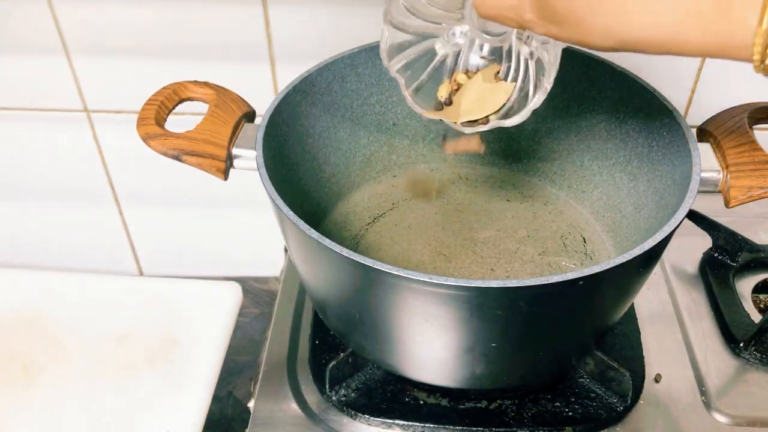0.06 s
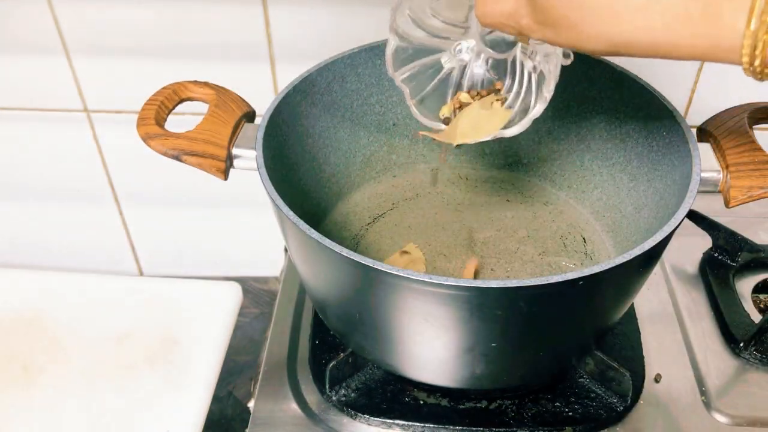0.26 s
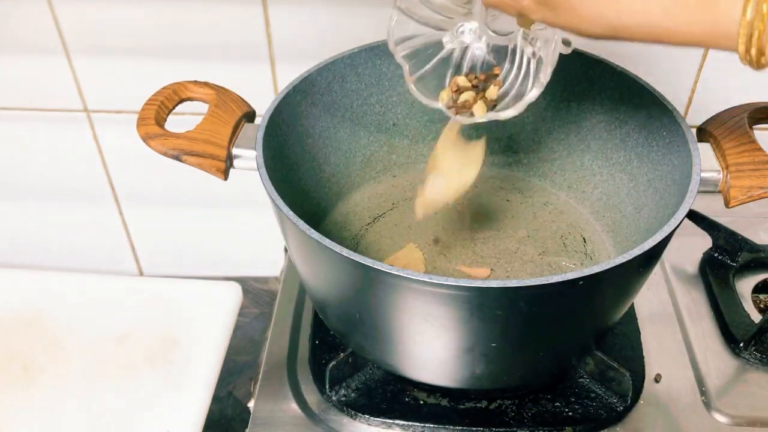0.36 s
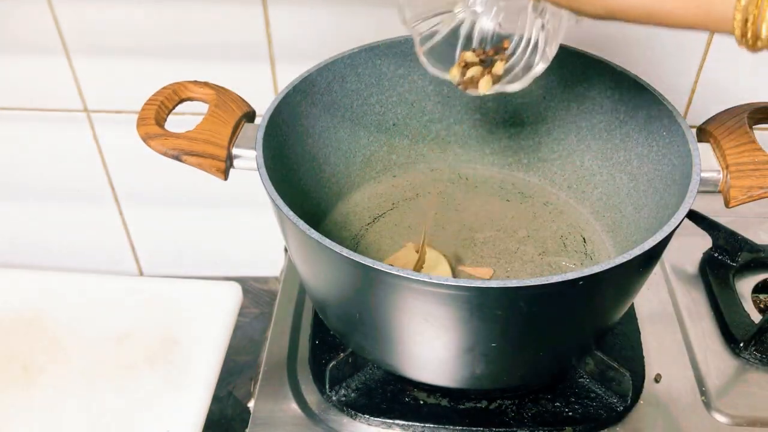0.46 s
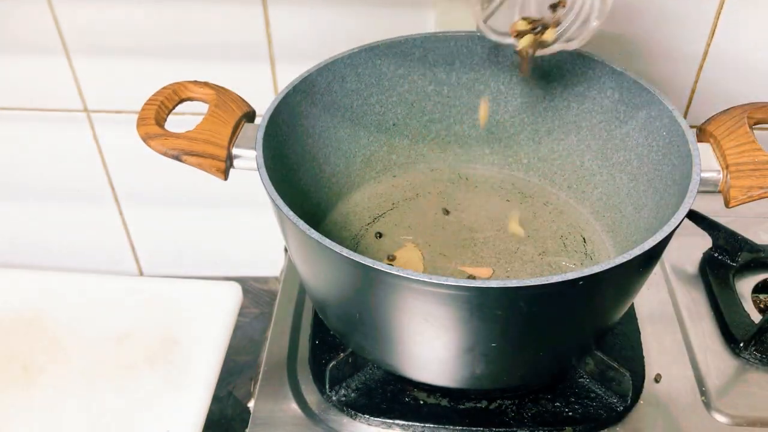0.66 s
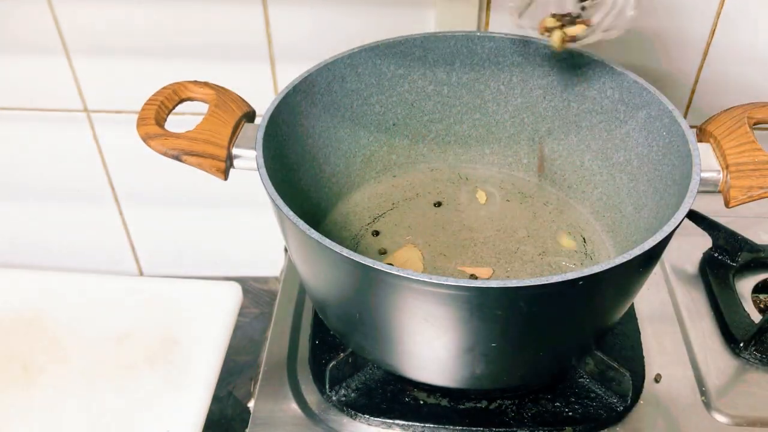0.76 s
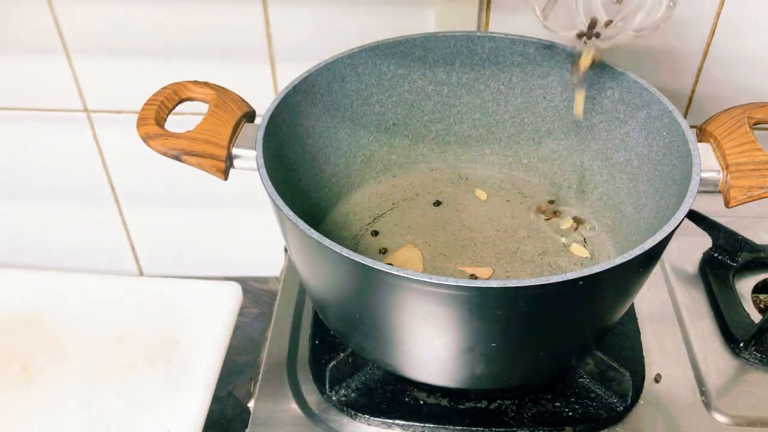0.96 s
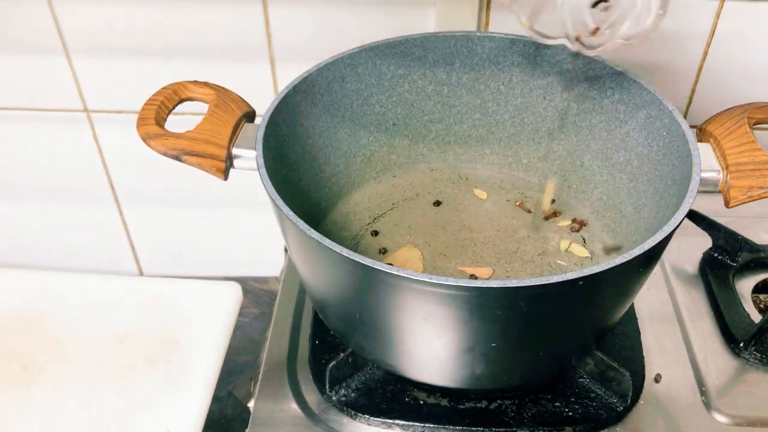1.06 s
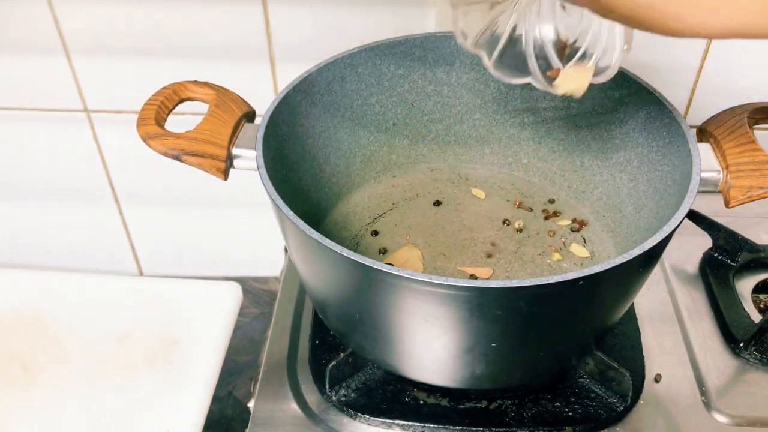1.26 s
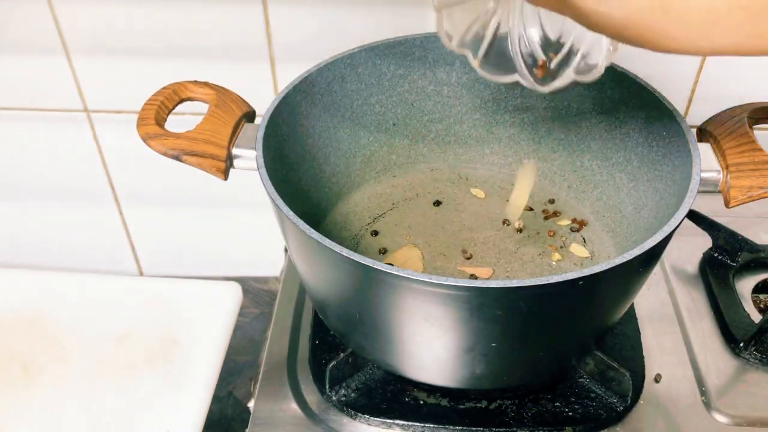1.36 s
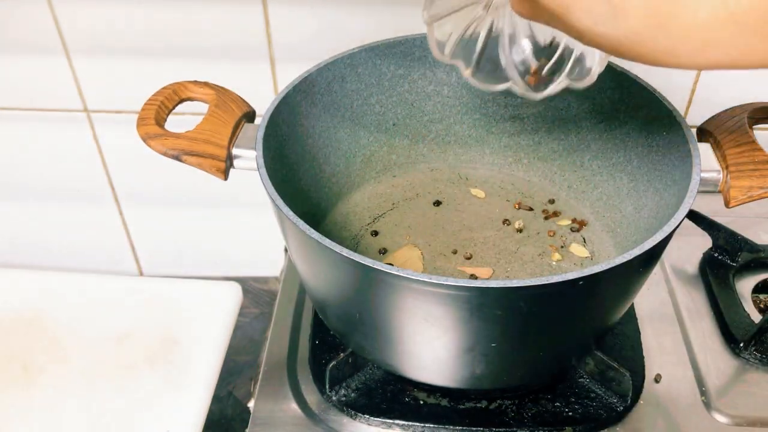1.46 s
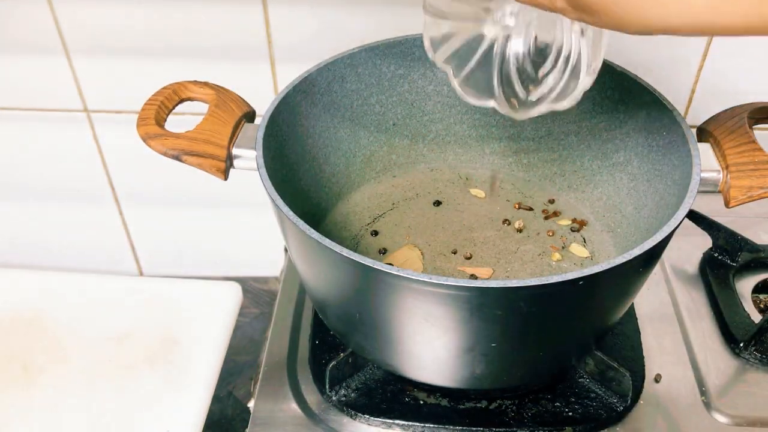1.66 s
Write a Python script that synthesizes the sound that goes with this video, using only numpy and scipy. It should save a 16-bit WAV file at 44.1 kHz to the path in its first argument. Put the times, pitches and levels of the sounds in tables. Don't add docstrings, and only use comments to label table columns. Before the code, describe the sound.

Hard seeds and bark pieces rattle and ping into a thin metal pot in a tiled kitchen

```python
import sys
import numpy as np
from scipy import signal
from scipy.fft import rfft, irfft, next_fast_len
from scipy.io import wavfile

SR = 44100
rng = np.random.default_rng(int(sys.argv[2]) if len(sys.argv) > 2 else 0)


def pcm_store(signal):
    levels = np.round(np.clip(np.atleast_2d(signal), -1, 1) * 32767)
    wavfile.write(sys.argv[1], SR, levels.astype(np.int16).T)


def gain_from_db(level_db):
    decades = np.asarray(level_db, float) / 20
    return 10 ** decades


N = 74970

# (frequency [Hz], level per Hz [dB])
FLAME_COLOUR = [(25, -28), (47, 3.5), (105, 6.5), (310, 6.5), (800, -9), (6000, -16.5), (10000, -28.5),
                (14500, -17.5)]
# (frequency [Hz], width [Hz], level [dB])
WHISTLES = [
    (998, 6.8, -71),
    (2087, 33, -73.5),
    (5220, 48, -72),
    (5450, 110, -75),
]
# (frequency [Hz], time to fall 60 dB [s])
ROOM_DECAY = [(400, 0.72), (800, 0.67), (3000, 0.54), (12000, 0.27)]
# (time [s], level [dB], length [s])
GLASS_SLIDES = [
    (0.031, -61, 0.017),
    (0.045, -59.5, 0.017),
    (0.078, -47.5, 0.0045),
    (0.082, -61, 0.017),
    (0.206, -49, 0.01),
    (0.975, -47.5, 0.009),
]
# (frequency [Hz], level [dB])
GLASS_COLOUR = [(2500, -11), (4500, -6), (6000, 2), (7500, -1), (9000, -9.5), (12000, -25)]
AIR_KNOCK_TIMES = [.168, .4826, .4945, .5275, .7157, .7744, 1.1373, 1.1885, 1.2255, 1.2891, 1.6275]
AIR_KNOCK_LEVELS = [-37, -25.5, -38, -33, -36.5, -21, -24.5, -32.5, -29, -39, -47]
# (frequency [Hz], level [dB])
AIR_KNOCK_COLOUR = [(800, -11.5), (2500, -14), (4000, 6), (6400, -5), (7200, -4.5), (10000, -15),
                    (15500, -9.5), (17000, -3.5)]
# (time [s], level [dB])
SEED_POUR = [
    (0.0, -65),
    (.13, -57),
    (.25, -41.5),
    (0.454, -42),
    (.67, -48),
    (0.814, -55),
    (.95, -53),
    (1.16, -40.5),
    (1.42, -47),
    (1.7, -57.5),
]
# (frequency [Hz], level [dB])
CRACK_COLOUR = [(7500, -51), (9000, -4.5), (9800, -11.5), (11000, -6.5), (12500, -2), (14200, -9.5),
                (15300, -4), (16500, 3.5)]
# (frequency [Hz], level [dB])
PUFF_COLOUR = [(400, -35), (1100, -8.5), (1600, -17.5), (3500, -9.5), (5900, -9), (6800, 3), (8500, -7),
               (9800, -35)]
WALL_TONES = [559, 680, 1228, 1934, 2566, 2898, 3463, 3928, 4424, 4659, 5237, 6318, 6877, 7410]
WALL_TWINS = [585, 642, 1183, 1946, 2586, 2923, 3530, 3977, 4460, 4957, 5282, 6358, 6830, 7066]
# (time to fall 60 dB [s], twin [dB], struck near [dB], struck middle [dB], struck far [dB])
WALL_RINGING = [(0.5, -39, -13.5, -12.5, -17.5), (0.19, -0.5, -11, -8, -9.5), (0.13, -4, -1.5, -7.5, -2),
                (0.14, -8, -10, -19.5, -9), (0.22, -6.5, -15, -10, -11.5),
                (0.084, -0.5, -14.5, -10.5, -2.5), (0.11, -3.5, -5, -3, -7.5), (0.054, 5, -20.5, -17, -3),
                (0.13, 0.5, -2.5, -8.5, -3.5), (0.34, 2.5, -9, -23, -17), (0.079, 0.5, 1, 0, 2),
                (0.035, 11.5, -7, -5.5, 2), (0.046, 5, -3, 2, -2.5), (0.063, -13, 3, 2.5, -32)]
BASE_TONES = [785, 960, 5412, 6760, 8090, 8457, 8740, 10270, 10960, 11550, 12330, 13500, 15080, 15400]
# (time to fall 60 dB [s], level [dB])
BASE_RINGING = [(0.04, -6.5), (0.074, -13.5), (0.07, -3.5), (0.076, 6.5), (0.066, -3), (0.075, -26),
                (0.15, -11.5), (0.067, -17), (0.26, -8.5), (0.074, -5), (0.083, 0), (0.033, -9), (.04, -28),
                (0.085, -5)]
PING_TONES = [680, 1228, 1934, 2566, 2898, 3463, 3928, 6340, 6860]
PING_DECAYS = [0.17, 0.22, 0.18, 0.23, 0.1, 0.11, 0.11, 0.045, 0.1]
# (time [s], level [dB])
PING_LANDINGS = [
    [(.139, -35), (.222, -36), (.323, -41), (.35, -37), (.405, -36), (.462, -38), (.48, -41), (.61, -38.5),
     (.717, -50), (1.006, -41), (1.138, -36.5), (1.167, -35.5), (1.19, -37.5), (1.308, -42), (1.34, -46)],
    [(.224, -34), (.323, -48), (.568, -52.5), (.9, -48.5), (1.19, -36.5), (1.268, -40.5), (1.341, -46),
     (1.15, -43)],
    [(.225, -33), (.323, -51), (.845, -42.5), (1.137, -42), (1.19, -42)],
    [(.375, -31), (.461, -29), (.481, -25.5), (.528, -34.5), (.6105, -32.5), (.846, -34.5), (1.007, -37),
     (1.226, -41), (1.308, -43.5)],
    [(.405, -33), (.58, -38.5), (.845, -32.5), (1.007, -34.5), (1.033, -49), (1.166, -40), (1.19, -38.5)],
    [(.222, -24), (.378, -30.5), (.61, -35), (.692, -57), (1.007, -45), (1.226, -42), (1.27, -44)],
    [(.585, -45), (.846, -38), (1.566, -49)],
    [(.725, -35), (.845, -31), (1.566, -36)],
    [(.35, -27.5), (.461, -29), (.59, -44), (.61, -35), (.481, -28), (.528, -39), (.568, -51), (.63, -44)],
]
# (time [s], level [dB])
BARK_BLOWS = [
    (.7176, -34.5),
    (.3235, -41),
]
# (time [s], peak level [dB], low ring [dB], middle ring [dB], crack [dB])
NEAR_PIECES = [
    (0.139, -31.5, 2, 5.5, -12.5),
    (0.167, -41, -14, -18, -11),
    (0.219, -16.5, -11, -51, -24),
    (0.224, -3.5, -25.5, -10, -19.5),
    (0.323, -24, -7, 2, -29),
    (0.35, -9.5, -25, -11, -22.5),
    (0.375, -10.5, -30.5, -11.5, -11.5),
    (0.404, -9.5, -24, -30, -22),
    (0.691, -34.5, -16.5, 4, -23),
    (0.724, -29, -11, -51, -28),
]
MIDDLE_PIECES = [(0.461, -14.5, -17.5, -10.5, -24), (0.48, -9, -21, -10.5, -18.5),
                 (0.496, -24, -11, -11, -23), (0.527, -14, -29, -47, -19.5),
                 (0.567, -18.5, -14.5, -15, -23), (0.587, -29, -26, -4, -17),
                 (0.609, -17, -22.5, -8.5, -20), (0.615, -40, -31, 10, -36), (0.718, -27.5, -14, -6.5, -42),
                 (0.844, -14, -39, -14, -24), (1.226, -13.5, -45, -14, -18.5), (1.27, -19, -39, -10.5, -22),
                 (1.308, -34.5, -14, 6.5, -17), (0.53, -21.5, -34, -5.5, -30), (.378, -20, -12, -4.0, -36),
                 (0.48, -24.5, -11, 0.5, -20)]
FAR_PIECES = [(.8364, -27.5, -37, -4.5, -14), (0.857, -23.5, -14, -2, -10), (0.97, -29, -40, -9, -17),
              (1.006, -8.5, -28, -5.5, -16.5), (1.032, -16, -23, -11, -25), (1.094, -24.5, -17, -3.5, -18),
              (1.124, -28, -11, -1, -31), (1.136, -18.5, -14.5, -43, -46), (1.167, -36, -7, -29, -18),
              (1.189, -12, -21, -13, -28), (1.339, -17, -21.5, -15.5, -22), (1.356, -24.5, -27, -5.5, -21),
              (1.407, -30, -42, -21, -20), (1.431, -29, -32, -11.5, -19), (1.458, -31.5, -21, -10, -30),
              (1.487, -34, -20, -5, -18), (1.507, -87, -21, -36, -14), (1.565, -29, -35, -14.5, -21),
              (1.627, -37.5, -20, -3.5, -66), (1.66, -41, -27, -11, -31), (1.696, -38, -32, -14, -31)]
TOP_RING_TRIM = [-3.5, -3, -8]
TOUCH_LEVELS = [-1, -7.5, -12.5, -13]


def unit(x):
    return x / np.sqrt(np.mean(x ** 2) + 1e-20)


def along(points, hz):
    f, v = np.transpose(points)
    return np.interp(np.log(hz + 1), np.log(f + 1), v)


def filtered(x, response):
    m = next_fast_len(N + 8192)
    return irfft(rfft(x, m) * response(np.fft.rfftfreq(m, 1 / SR)), m)[..., :N]


def train(s, gain):
    place = np.clip(np.round(s * SR).astype(int), 0, N - 1)
    return np.bincount(place, gain, N)


def burner():
    noise = rng.standard_normal(N)
    out = gain_from_db(-59) * unit(filtered(noise, lambda hz: gain_from_db(along(FLAME_COLOUR, hz))))
    for hz, width, db in WHISTLES:
        noise = rng.standard_normal(N)
        whistle = filtered(noise, lambda f: 1 / (1 + ((f - hz) / width) ** 2))
        out += gain_from_db(db) * unit(whistle)
    return out


def kitchen(x):
    wall_delay_s = 0.006
    hz, t, z = signal.stft(rng.standard_normal(SR // 2), SR, nperseg=256)
    dying = z * gain_from_db(-60 * t / along(ROOM_DECAY, hz)[:, None])
    tail = signal.istft(dying, SR, nperseg=256)[1]
    delayed = np.pad(x, (round(wall_delay_s * SR), 0))
    return signal.fftconvolve(delayed, tail / np.linalg.norm(tail))[:N]


def bowl():
    t = np.arange(N) / SR
    stroke = np.zeros(N)
    for s, db, length in GLASS_SLIDES:
        stroke += gain_from_db(db) * np.exp(-((t - s - length / 2) / length * 2) ** 2)
    grit = rng.standard_normal(N)
    grit *= gain_from_db(5.1 * rng.standard_normal(N // 40 + 1).repeat(40)[:N])
    return stroke * unit(filtered(grit, lambda hz: gain_from_db(along(GLASS_COLOUR, hz))))


def crack(s, db, t60, spectrum):
    fade = signal.lfilter([1], [1, -gain_from_db(-60 / (t60 * SR))], train(s, gain_from_db(db)))
    grit = rng.standard_normal(N)
    colour = lambda hz: gain_from_db(along(spectrum, hz))
    return filtered(fade * grit, colour) / np.std(filtered(grit, colour))


def air_knocks():
    return crack(np.array(AIR_KNOCK_TIMES), np.array(AIR_KNOCK_LEVELS), 0.0087, AIR_KNOCK_COLOUR)


def ring(x, hz, t60):
    rise_s = 7.8 / hz
    w = 2 * np.pi * hz / SR
    radii = gain_from_db(-60 / (np.array([max(t60, 0.01), rise_s]) * SR))
    fade, rise = (signal.lfilter([0, np.sin(w)], [1, -2 * r * np.cos(w), r * r], x) for r in radii)
    return fade - rise


def pot(s, spot, low_db, mid_db, high_db, top_db, scatter_db):
    walls, twins = [], []
    for hz, twin_hz, (t60, twin_db, *db) in zip(WALL_TONES, WALL_TWINS, WALL_RINGING):
        spot_db = np.array(db)[spot]
        walls.append((hz, t60, spot_db))
        twins.append((twin_hz, t60, spot_db + twin_db))
    base = [(hz, t60, db) for hz, (t60, db) in zip(BASE_TONES, BASE_RINGING)]
    modes = walls + twins + base
    luck = rng.standard_normal((len(s), len(modes), 2))
    out = np.zeros(N)
    for k, (hz, t60, db) in enumerate(modes):
        band = np.searchsorted([1500, 4200, 9000], hz)
        band_db = [low_db, mid_db, high_db, top_db][band]
        gain = gain_from_db(db + band_db + scatter_db * luck[:, k, 0])
        push = np.sign(luck[:, k, 1])
        out += ring(train(s, gain * push), hz, t60)
    return out


def seeds():
    count, spread_db = 330, 3
    s, size, spot = rng.uniform(size=(count, 3)).T
    s = s * N / SR
    db = np.interp(s, *np.transpose(SEED_POUR)) - spread_db * np.log(np.maximum(size, 0.07))
    ring_db = db - 28.5
    rung = pot(s, (spot * 3).astype(int), ring_db + 6.5, ring_db + 14.0, ring_db, ring_db - 31, 1.5)
    sharp = crack(s, db - 13, 0.0097, CRACK_COLOUR)
    puff = crack(s, db - 17, 0.024, PUFF_COLOUR)
    return rung + sharp + puff


def pings():
    out = np.zeros(N)
    s, db = np.transpose(BARK_BLOWS)
    for hz in (577, 704):
        out += ring(train(s, gain_from_db(db)), hz, 0.057)
    for hz, t60, landings in zip(PING_TONES, PING_DECAYS, PING_LANDINGS):
        s, db = np.transpose(landings)
        out += ring(train(s, gain_from_db(db)), hz, t60)
    return out


def pieces():
    tumble_s = 0.002
    sides = (NEAR_PIECES, MIDDLE_PIECES, FAR_PIECES)
    rows = np.array([(*row, spot) for spot, table in enumerate(sides) for row in table])
    touch = np.tile(np.arange(4), len(rows))
    s, db, low, mid, top, spot = np.repeat(rows, 4, axis=0).T
    spot = spot.astype(int)
    s = s + tumble_s * touch * rng.uniform(0.6, 1.4, len(s))
    db = db + np.array(TOUCH_LEVELS)[touch]
    top_db = db + top + np.array(TOP_RING_TRIM)[spot]
    rung = pot(s, spot, db + low + 7, db + mid + 2.5, db - 12.5, top_db, 0.5)
    sharp = crack(s, db + top + 2, 0.024, CRACK_COLOUR)
    puff = crack(s, db - 20.5, 0.025, PUFF_COLOUR)
    return gain_from_db(-13) * rung + sharp + puff


def scene():
    thin_hz = 350
    contacts = pieces() + pings() + seeds() + bowl()
    near = filtered(contacts, lambda hz: 1 / (1 + (thin_hz / (hz + 1)) ** 4))
    ticks = air_knocks()
    echo = kitchen(gain_from_db(-8) * near + gain_from_db(-10.5) * ticks)
    return (near + ticks + echo + burner())[None]


def top_cut(x):
    return signal.sosfilt(signal.butter(12, 17170, fs=SR, output="sos"), x)


def record(dry):
    mix = filtered(dry, lambda hz: np.where(hz < 15800, 1, gain_from_db(-52)))
    return top_cut(mix)


dry = scene()
out = record(dry)
pcm_store(out)
```